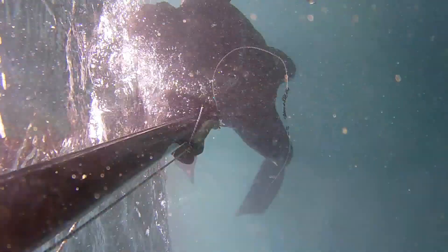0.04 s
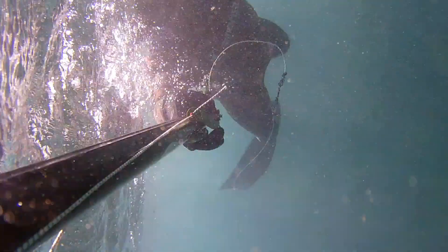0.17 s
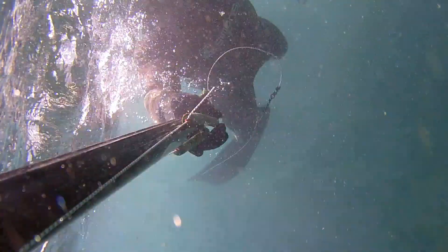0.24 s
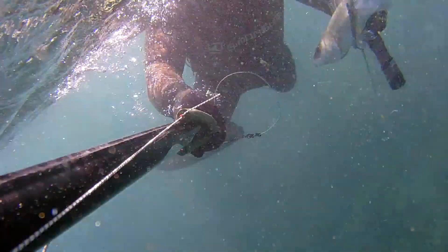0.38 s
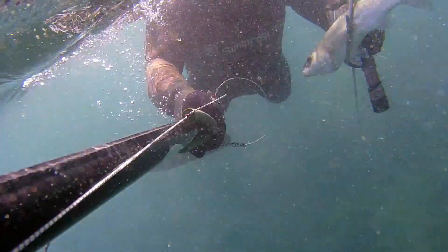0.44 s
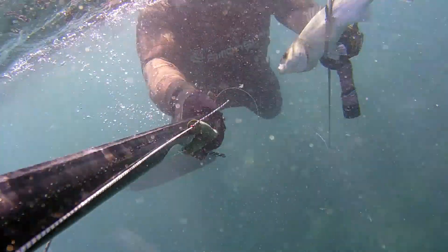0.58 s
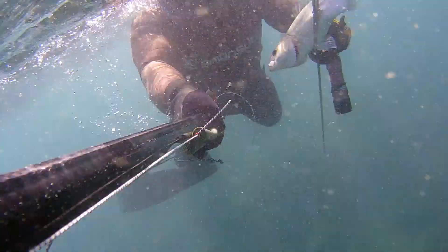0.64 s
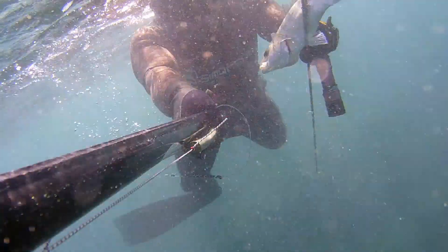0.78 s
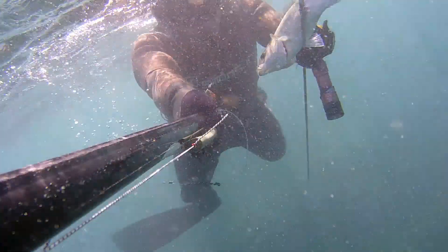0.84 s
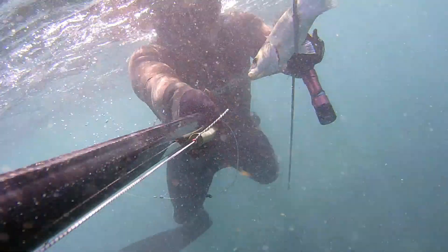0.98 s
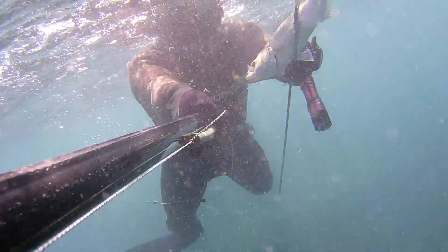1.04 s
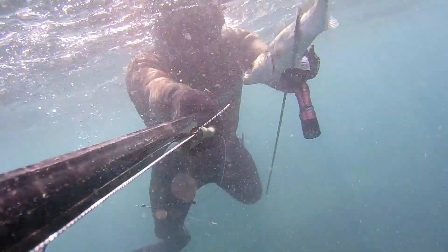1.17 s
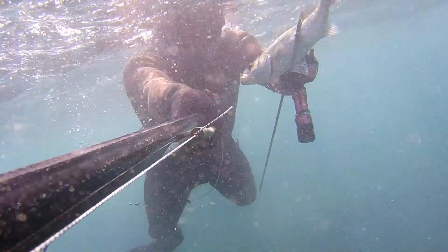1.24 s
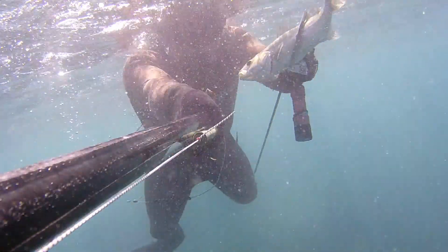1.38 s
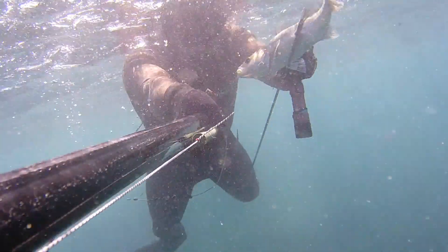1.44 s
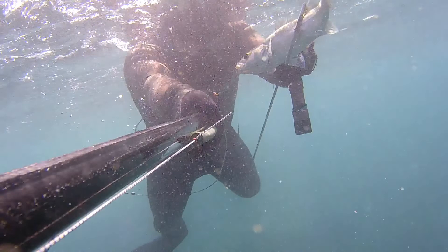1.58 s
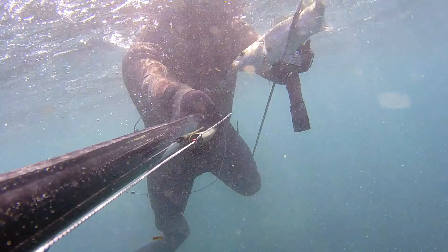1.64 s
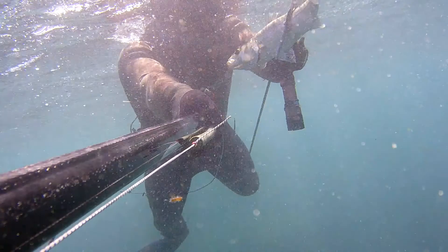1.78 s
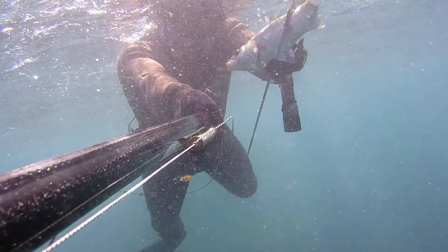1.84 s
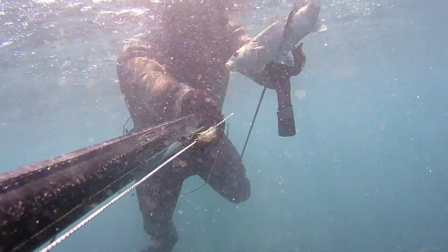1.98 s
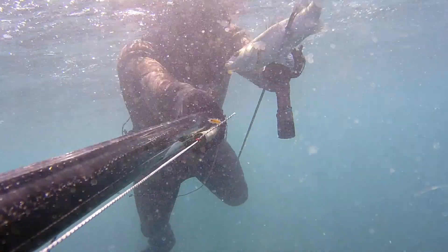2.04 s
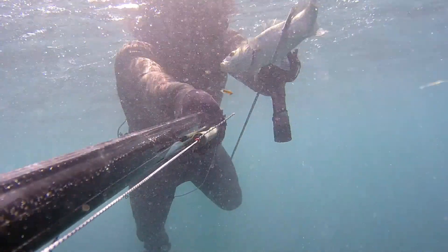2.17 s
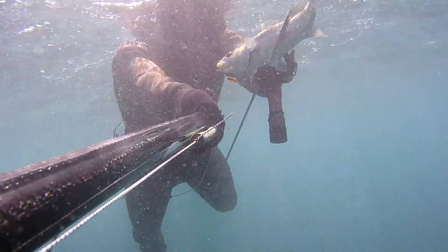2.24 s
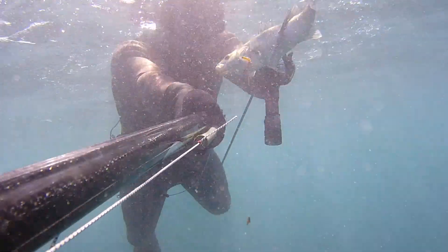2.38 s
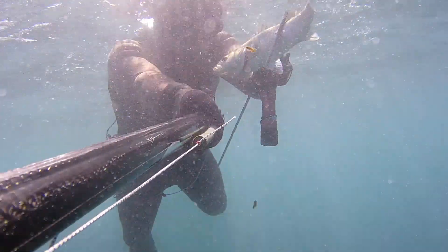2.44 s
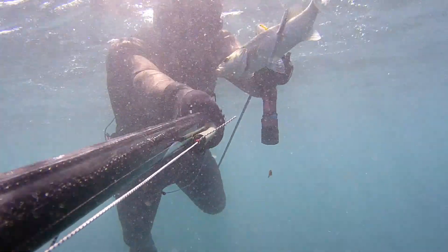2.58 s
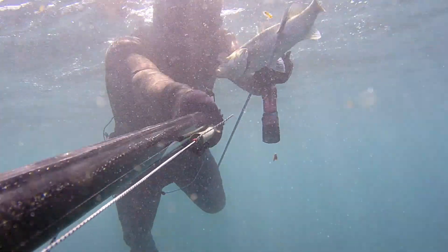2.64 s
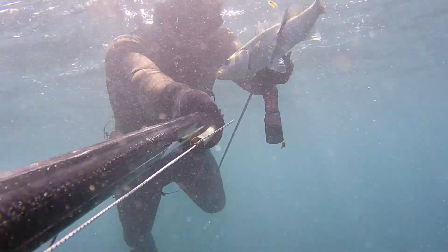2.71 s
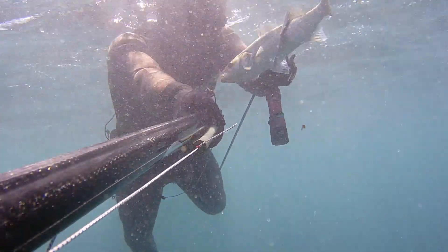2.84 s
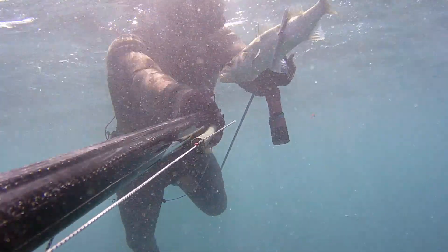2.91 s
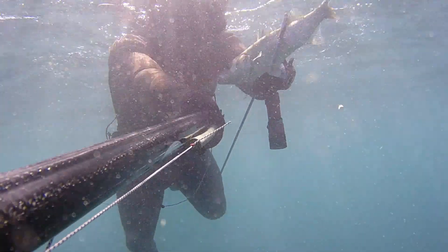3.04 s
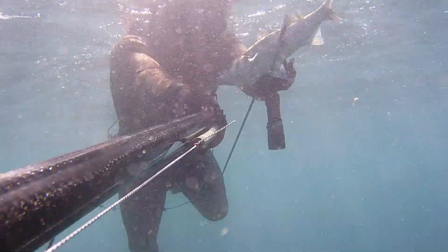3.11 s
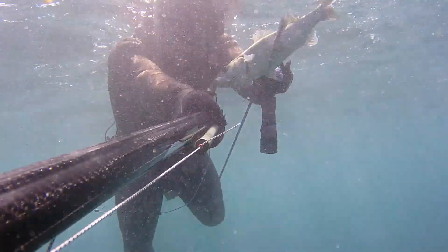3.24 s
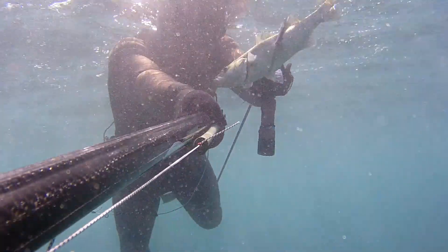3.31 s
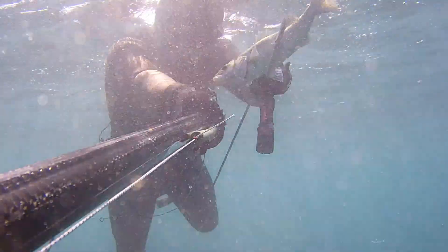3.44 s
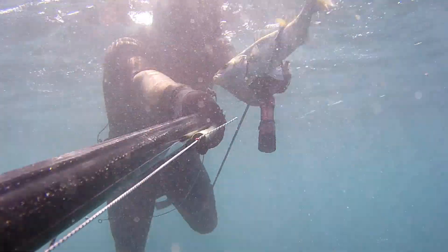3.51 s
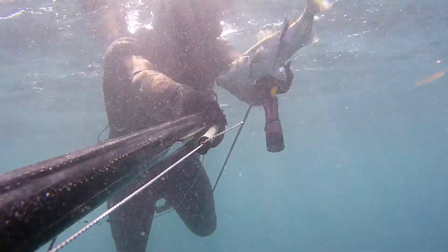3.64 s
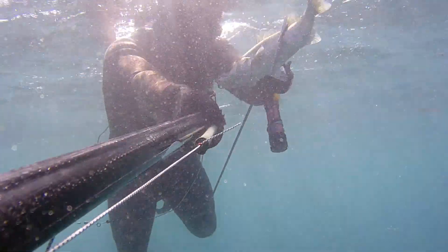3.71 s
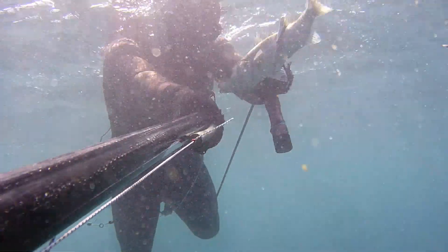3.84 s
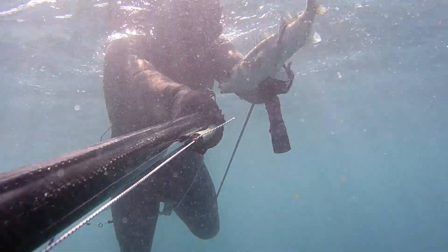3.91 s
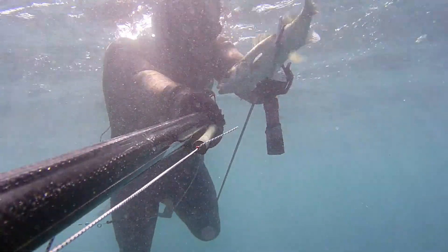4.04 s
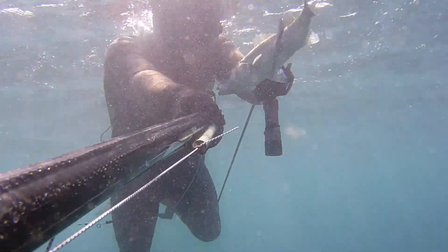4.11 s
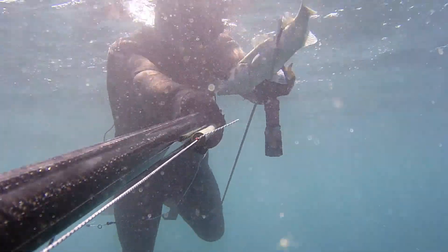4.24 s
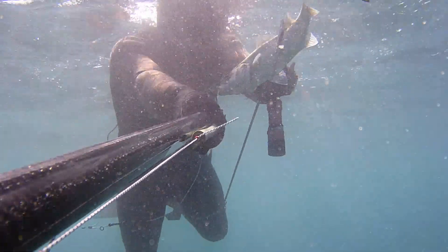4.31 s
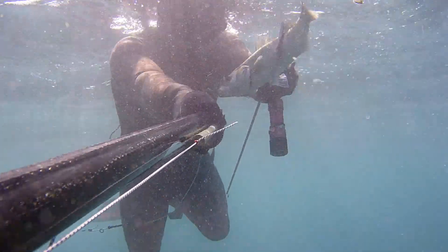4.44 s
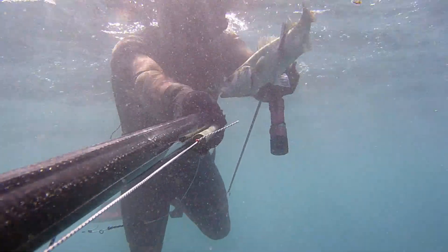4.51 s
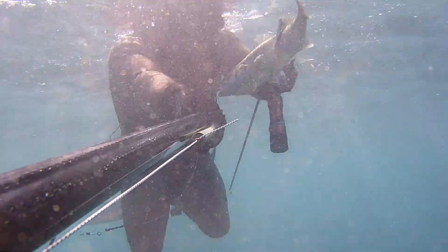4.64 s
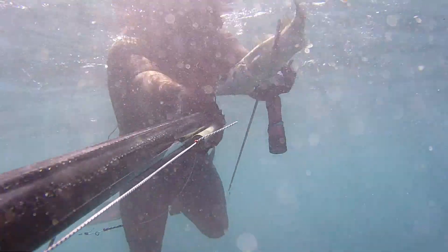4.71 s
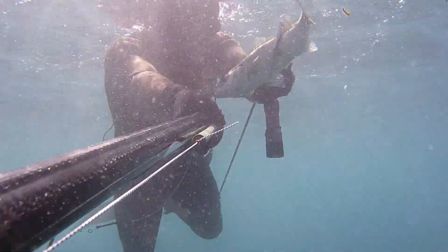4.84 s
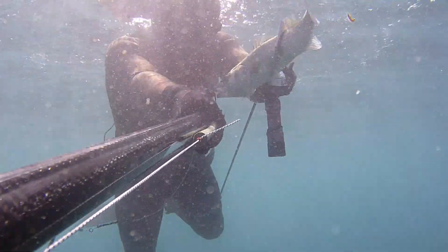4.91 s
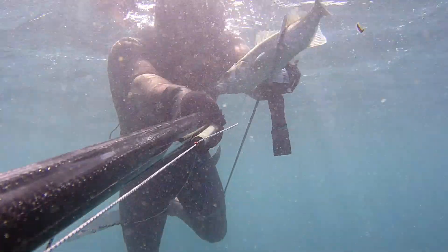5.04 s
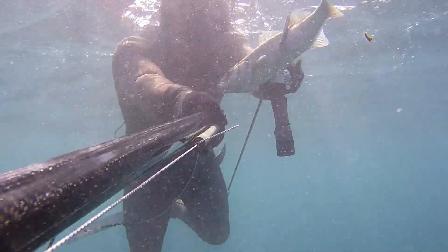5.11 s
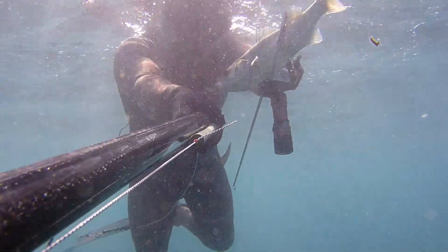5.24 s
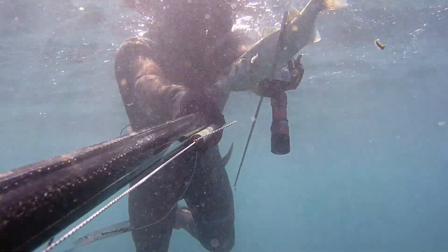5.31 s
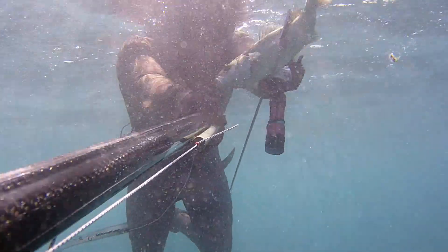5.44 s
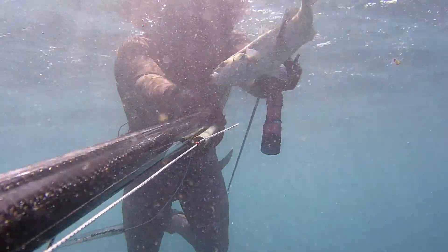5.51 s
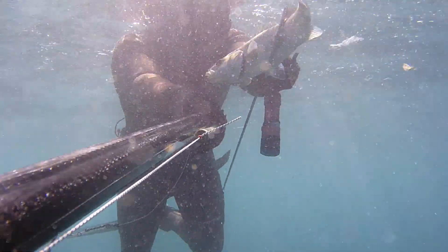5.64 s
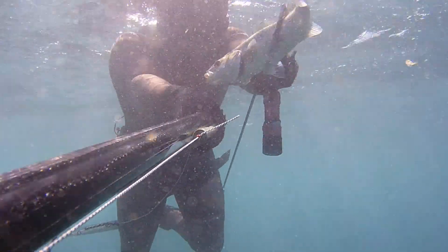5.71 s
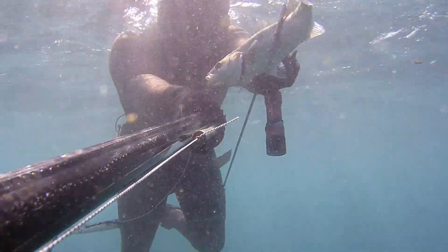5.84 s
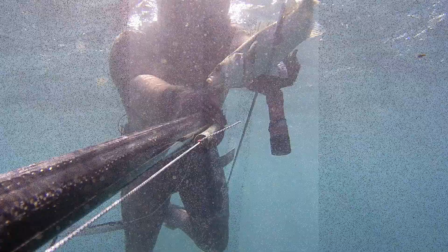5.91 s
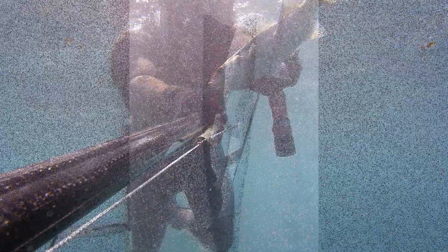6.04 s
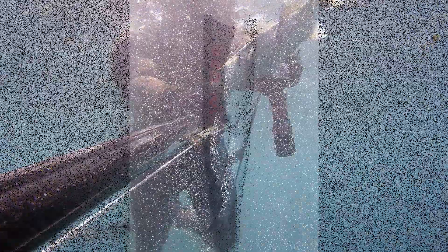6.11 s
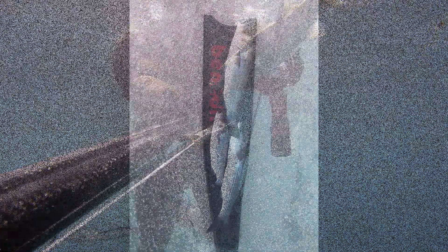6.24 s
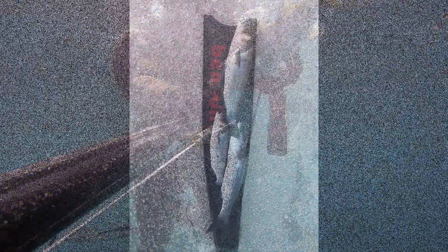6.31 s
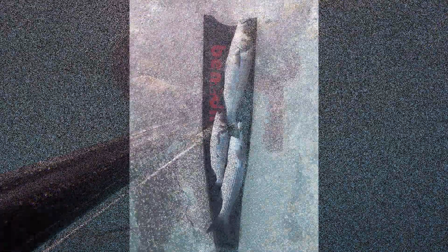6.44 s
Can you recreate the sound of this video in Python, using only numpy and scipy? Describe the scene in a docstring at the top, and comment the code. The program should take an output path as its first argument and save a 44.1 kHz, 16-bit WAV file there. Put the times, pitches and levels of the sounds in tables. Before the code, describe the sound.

Just beneath the surface, a microphone in a housing on a speargun catches hard knocks, rubbing line and sloshing bubbles. Within the first second the blows distort, peaking near half a second, followed by a loud ringing bubble. After that it turns much quieter: soft knocks, double clacks, tiny ticks and low grip rumble over the faint dull wash of open water, stopping abruptly.

```python
"""Just below the surface of open water, close up: a microphone in a housing rides on a diver's speargun.
The gun is swung round: hard knocks, sloshing and a loud ringing bubble overload the microphone.
Then gun and line knock softly on the housing, the gun clacks through its play, the grip rumbles and creaks.
Knocks ring decaying housing modes, shaft ticks are pings with noise bursts, and bubbles are gliding sines.
Shaped noise is the distant wash of the water; swarms of random bubbles make the sloshing."""
import sys
import numpy as np
from scipy import signal
from scipy.fft import rfft, irfft
from scipy.io import wavfile
from scipy.ndimage import uniform_filter1d

SR = 44100
rng = np.random.default_rng(int(sys.argv[2]) if len(sys.argv) > 2 else 0)


def master(y):
    """Save y as 16-bit WAV."""
    cut = np.clip(np.atleast_2d(y).T, -1, 1)
    pcm = np.round(cut * 32767)  # scale
    wavfile.write(sys.argv[1], SR, pcm.astype(np.int16))


N = 285765
TIME = np.arange(N) / SR
END_S = 6.335  # all is silent from here


def from_db(db):
    """Decibels to amplitude gain."""
    return 10 ** (np.asarray(db) / 20)


def rms_one(x):
    """Scale to unit rms."""
    return x / np.sqrt(np.mean(x ** 2) + 1e-20)


def in_time(rows):
    """Interpolate each column of a curve over its first column, time, at every sample."""
    s, *columns = np.transpose(rows)
    return [np.interp(TIME, s, column) for column in columns]


def cut(x, hz, kind, order=2):
    """Butterworth filter."""
    edges_hz = np.clip(hz, 10, SR * .45)
    sections = signal.butter(order, edges_hz, kind, fs=SR, output="sos")
    return signal.sosfilt(sections, x + 1e-18)


def add(out, start_s, sound):
    """Mix a sound in from its start time."""
    i = max(round(start_s * SR), 0)
    out[i:i + len(sound)] += sound[:N - i]


def dying(t, t60):
    """Exponential decay, down 60 dB after t60 seconds."""
    return from_db(-60 * t / t60)


def ring(clicks, hz, t60):
    """Two-pole resonator: a unit click sets a dying sine of initial height 1 ringing."""
    r = dying(1 / SR, t60)
    w = 2 * np.pi * hz / SR
    return signal.lfilter([0, np.sin(w)], [1, -2 * r * np.cos(w), r * r], clicks + 1e-18)


def grains(per_s, spread_db):
    """Random clicks of uneven size and sign."""
    sizes = from_db(spread_db * np.minimum(rng.exponential(1, N), 4))
    signs = rng.choice([-1, 1], N)
    return sizes * signs * (rng.random(N) < per_s / SR)


def bubble(t, hz, t60, rise, pinch_s=0.00045):
    """A bubble pinches off and rings as a dying sine whose pitch glides by rise octaves per s."""
    phase = 2 * np.pi * np.cumsum(hz * 2 ** (rise * t)) / SR
    onset = np.exp(-t / pinch_s) - 1
    return onset * dying(t, t60) * np.sin(phase)


def swarm(per_s, low_hz, high_hz, cycles, rise, span):
    """Bubbles at random times over span seconds, rising in pitch; the smaller, the weaker. Unit rms there."""
    out, t = np.zeros(N), TIME[:SR // 8]
    for when, size, strength in rng.random((round(per_s * span), 3)):
        hz = low_hz * (high_hz / low_hz) ** size
        t60 = cycles / hz
        add(out, when * span, (strength + .5) / hz ** 2 * bubble(t, hz, t60, rise))
    return out / np.std(out[TIME < span])


# spectrum of the open water all round: pitch_hz [Hz], level_db [dB, relative]
SEA_SPECTRUM = [(25, -20.5), (66, -6), (148, -5), (260, -9), (550, -7.5), (1150, -17.5), (2060, -22),
                (5140, -33), (15500, -41.5)]
SEA_DB = -52  # rms of the whole wash


def sea():
    """Noise shaped in frequency: the steady dull wash of the open water with a faint hiss on top."""
    hz, level_db = np.transpose(SEA_SPECTRUM)
    bins_hz = np.maximum(np.fft.rfftfreq(N, 1 / SR), 1)
    shape = from_db(np.interp(np.log(bins_hz), np.log(hz), level_db))
    wash = irfft(rfft(rng.standard_normal(N)) * shape, N)
    return from_db(SEA_DB) * rms_one(wash)


# swell of the sloshing at the surface just above: start_s [s], level_db [dB, of the gurgle]
SLOSH_SWELL = [(0, -21.5), (.04, -36), (.14, -58), (0.181, -29.5), (.38, -50), (0.601, -28), (.7, -30.5),
               (0.759, -43), (.9, -36.5), (1.02, -54), (1.5, -49)]


def slosh(fizz_db=-24):
    """Trapped air rings in swarms: a gurgle of mid-sized bubbles under a fizz of tiny ones."""
    span = SLOSH_SWELL[-1][0]
    gurgle = swarm(per_s=480, low_hz=475.5, high_hz=1257, cycles=39, rise=2.7, span=span)
    fizz = swarm(per_s=270, low_hz=2600, high_hz=4940, cycles=13, rise=3, span=span)
    level_db, = in_time(SLOSH_SWELL)
    return from_db(level_db) * (gurgle + from_db(fizz_db) * fizz)


# path of a large air pocket climbing to the surface: start_s [s], pitch_hz [Hz], level_db [dB, peak]
AIR_POCKET_PATH = [(.785, 250, -48), (.805, 247.3, -12), (.86, 271, -26), (.92, 279, -30),
                   (.95, 305, -38.5), (.98, 342, -44.5), (1.005, 435, -37.5), (1.04, 473, -39)]


def air_pocket():
    """One long sine, swooping up as the water above the pocket thins."""
    hz, level_db = in_time(AIR_POCKET_PATH)
    alive = (TIME > AIR_POCKET_PATH[0][0]) & (TIME < AIR_POCKET_PATH[-1][0])
    return alive * from_db(level_db) * np.sin(2 * np.pi * np.cumsum(hz) / SR)


# single bubbles near the housing, and the short low thumps of the loudest knocks:
# start_s [s], pitch_hz [Hz, at the start], level_db [dB, about peak], t60_s [s]
BUBBLES_AND_THUMPS = [(.232, 650, -19.5, 0.056), (0.352, 194, -7.5, 0.023), (.354, 314, -2, 0.036),
                      (0.452, 345, -1.5, 0.024), (.462, 241, -5.5, 0.13), (0.481, 186, -9.5, 0.11),
                      (0.497, 532.4, -4.5, 0.084), (.511, 3530, -34, 0.025), (.561, 3030, -15.5, 0.023),
                      (.568, 793, -12.5, 0.049), (.571, 644, -14, .06), (.575, 274, -30.5, 0.97),
                      (.619, 652, -16, .14), (.62, 2800, -27.5, .03), (0.665, 382, -13, 0.036),
                      (.674, 700, -18.5, 0.18), (.677, 894, -14, 0.091), (0.685, 2870, -36.5, 0.064),
                      (.784, 459.4, 4.5, 0.17), (.784, 533, -7, 0.13), (.8, 671, -4.5, 0.12),
                      (.876, 619, -18, 0.19), (0.981, 1034, -34, 0.053), (1.076, 2830, -39.5, 0.019),
                      (1.079, 653, -30, 0.17), (3.824, 579, -26, 0.081)]
# pitches above the steady one glide up, lower ones sag: octaves per s for each octave of pitch
STEADY_HZ, GLIDE_PER_OCTAVE, MAX_GLIDE_OCTAVES_PER_S = 459.5, 2.9, 2.1


def bubbles_and_thumps():
    """Dying sines: single bubbles down to tiny pings, and low thumps under the loudest knocks."""
    out = np.zeros(N)
    for start_s, hz, level_db, t60 in BUBBLES_AND_THUMPS:
        rise = min(GLIDE_PER_OCTAVE * np.log2(hz / STEADY_HZ), MAX_GLIDE_OCTAVES_PER_S)
        add(out, start_s, from_db(level_db) * bubble(TIME[:SR // 3], hz, t60, rise))
    return out


def ringing_grains(level_db=-11):
    """Small ringing grains gliding upward, scattered at random about eleven a second, louder around blows."""
    scattered = swarm(per_s=11, low_hz=498, high_hz=1050, cycles=30, rise=4, span=END_S)
    return from_db(grip_db() + level_db) * scattered


# drag of the line along the barrel: start_s [s], level_db [dB]
LINE_DRAG = [(0, -61), (.11, -36), (.14, -50.5), (.3, -38.5), (.41, -61.5), (.62, -41), (.74, -51),
             (1.0, -93)]


def line_rub(slips_per_s=900):
    """Quick slips of the line excite the upper housing modes."""
    rings = np.zeros(N)
    for hz, mode_db, t60 in HOUSING_MODES:
        if hz > REGISTER_EDGES[1]:
            rings += from_db(mode_db) * ring(grains(slips_per_s, 6.7), hz, t60)
    level_db, = in_time(LINE_DRAG)
    return from_db(level_db) * rms_one(cut(rings, [1250, 1800], "band"))


# the grip tightens before each blow and relaxes after it, more so for a strong one
GRIP_REST_DB, GRIP_PEAK_DB, GRIP_FOLLOWS = -49, -28.5, 0.38  # peak for a blow of 0 dB; dB per dB of blow
GRIP_TIGHTEN_DB_PER_S, GRIP_RELAX_DB_PER_S = 174.5, 73


def grip_db():
    """How hard the grip works the gun: it swells round every blow and sinks back to rest."""
    s, db, *_ = np.transpose(contacts())
    coarse = TIME[::200]
    since = coarse[:, None] - s
    fall_db = np.maximum(GRIP_RELAX_DB_PER_S * since, -GRIP_TIGHTEN_DB_PER_S * since)
    swells = GRIP_PEAK_DB + GRIP_FOLLOWS * db - fall_db
    return np.interp(TIME, coarse, np.maximum(swells.max(axis=1), GRIP_REST_DB))


def handling(rumble_db=-3, creak_db=-9.5, creaks_per_s=70, dull_hz=1100):
    """The shifting grip excites the housing: a rumble in the low modes, tiny creaks in the others."""
    effort = from_db(grip_db())
    push = effort * grains(500, 3.3)
    slips = effort * grains(creaks_per_s, 2.3)
    rumble, creaks = np.zeros((2, N))
    for hz, mode_db, t60 in HOUSING_MODES:
        if hz < REGISTER_EDGES[0]:
            rumble += from_db(mode_db) * ring(push, hz, t60)
        if hz > REGISTER_EDGES[0]:
            # each slip meets every mode with a strength of its own
            creaks += from_db(mode_db) * ring(slips * rng.standard_normal(N), hz, t60)
    creaks = cut(cut(creaks, dull_hz, "low", order=1), [330, 2200], "band")
    mix = from_db(rumble_db) * rms_one(rumble) + from_db(creak_db) * rms_one(creaks)
    return np.sqrt(np.mean(effort ** 2)) * mix


# lone sharp ticks of shaft and line: start_s [s], level_db [dB], pitch_hz [Hz]
LONE_TICKS = [(.187, -29, 3296), (.21, -29, 3070), (.479, -24, 3930), (.493, -22.5, 3220),
              (.527, -36, 2850), (.664, -29, 3450), (.718, -33, 3130), (.878, -38.5, 4030),
              (.927, -36, 3240), (1.204, -36, 3470), (1.441, -38.5, 3850), (1.547, -39, 3560),
              (1.83, -35.5, 3640), (2.008, -46.5, 4330), (2.552, -41, 5100), (3.289, -38.5, 2780),
              (3.388, -24.5, 2780), (3.634, -44.5, 3340), (3.745, -30, 2830), (4.385, -44, 3500),
              (4.427, -36.5, 3640), (4.66, -47, 3600), (4.95, -27.5, 3200), (5.003, -37, 3620),
              (5.062, -37.5, 3150), (5.192, -33.5, 3470), (5.557, -46, 3480), (5.708, -44, 3600)]
SEAT_TICK_DB, SEAT_TICK_HZ = -15.5, 2860  # level against the seat of a clack


def all_ticks():
    """The lone ticks and the one at the seat of each clack: (start_s, level_db, pitch_hz)."""
    seat_ticks = [(s + SEAT_AFTER_S, seat_db + SEAT_TICK_DB, SEAT_TICK_HZ) for s, _, seat_db, _ in GUN_CLACKS]
    return list(LONE_TICKS) + seat_ticks


def ticks(t60=0.0064, tone_db=0, spray_db=-2, spray_t60=0.028, below=4.05, above=1.186):
    """A tick is a brief ping with a burst of fine contacts, noise filtered round its pitch."""
    out, t = np.zeros(N), TIME[:SR // 16]
    for start_s, level_db, hz in all_ticks():
        ping = from_db(tone_db) * dying(t, t60) * np.sin(2 * np.pi * hz * t)
        spray = 2 * from_db(spray_db) * dying(t, spray_t60) * rng.standard_normal(len(t))
        tick = cut(cut(ping + spray, hz / below, "high"), hz * above, "low", order=6)
        add(out, start_s, from_db(level_db) * tick)
    return out


# modes of the steel shaft: pitch_hz [Hz], level_db [dB], t60_s [s]
SHAFT_MODES = [(3383, -2.5, 0.04), (4720, -6, 0.018), (6000, -26, .025), (8880, -22, 0.064)]
# a blow's crack grows faster than its ring: level at a ring of 0 dB, and dB per dB of ring
KNOCK_CRACK_DB, KNOCK_CRACK_GROWTH = -23, 1.8
# a higher tick cracks more: level against the tick at the given pitch, and its growth
TICK_CRACK_DB, TICK_CRACK_HZ, TICK_CRACK_DB_PER_OCTAVE = -31, 3240, 24.5


def cracks(crack_t60=0.033, crack_top_hz=10500, shaft_db=8):
    """Ticks and blows give a noise crack and ring the shaft, high ticks and hard blows the most."""
    sharp = []
    for s, db, hz in all_ticks():
        octaves = np.log2(hz / TICK_CRACK_HZ)
        sharp.append((s, db + TICK_CRACK_DB + TICK_CRACK_DB_PER_OCTAVE * octaves))
    for s, *contact in contacts():
        ring_db = register_levels(*contact)[-1]
        sharp.append((s, KNOCK_CRACK_DB + KNOCK_CRACK_GROWTH * ring_db))
    crack, blows = np.zeros((2, N))
    t = TIME[:SR // 16]
    for s, db in sharp:
        add(crack, s, 2 * from_db(db) * dying(t, crack_t60) * rng.standard_normal(len(t)))
        add(blows, s, from_db([db + shaft_db]))
    shaft = sum(from_db(db) * ring(blows, hz, t60) for hz, db, t60 in SHAFT_MODES)
    return shaft + cut(cut(crack, 2100, "high"), crack_top_hz, "low")


# single knocks of gun and line on the housing: start_s [s], level_db [dB], hardness_db [dB]
SINGLE_KNOCKS = [(.001, -16, -0.5), (.021, -20.5, -9), (.031, -22, -11), (0.103, -35.5, -6),
                 (0.175, -25.5, -6), (.188, -15.5, 24.5), (.208, -14.5, 7.5), (.216, -15.5, 11),
                 (0.266, -21, 17), (.294, -25.5, -5), (.317, -17, 3.5), (.361, -8, 8), (0.414, -25.5, 25),
                 (0.459, 0, 3), (.477, -6.5, 2), (.489, -7, 10), (.538, -20.5, 11), (.611, -24, 14),
                 (.664, -12, 12), (.702, -20.5, 16.5), (.915, -26.5, 0), (1.176, -22.5, 3),
                 (1.235, -24.5, 21.5), (1.327, -34.5, 2), (1.374, -19.5, 13), (1.4, -22, 5),
                 (1.44, -26.5, -2), (1.477, -29, 1), (1.53, -33, -3.5), (1.609, -38.5, 16),
                 (1.756, -29, -0.5), (1.792, -24.5, 0.5), (1.871, -35.5, -3), (1.985, -26.5, -1),
                 (2.008, -30.5, -2), (2.067, -32, -0.5), (2.108, -31, 0), (2.161, -35.5, 2),
                 (2.357, -34.5, 22), (2.373, -30.5, 2), (2.637, -37, -4), (2.664, -44, 33),
                 (2.852, -40.5, 19), (2.986, -36, 1), (3.083, -37.5, -2), (3.137, -34, -1.5),
                 (3.18, -41, 43), (3.258, -35.5, -3), (3.306, -37.5, 1), (3.356, -33.5, 26),
                 (3.408, -34.5, 2), (3.424, -30.5, 27), (3.602, -37, -5), (3.668, -38.5, 17),
                 (3.761, -41, -5), (3.923, -36, 16), (4.006, -34.5, 19), (4.183, -36, -2),
                 (4.287, -40.5, -7), (4.364, -38.5, 2), (4.56, -43, -4), (4.642, -35.5, -5.5),
                 (4.694, -36.5, -2), (4.836, -37, 1), (4.932, -29.5, 8), (4.975, -41, 9), (5.004, -33, -3),
                 (5.051, -30.5, 3), (5.155, -37.5, -7.5), (5.402, -41.5, -7), (5.489, -31, -2),
                 (5.535, -32.5, 13), (5.705, -34.5, 1), (5.88, -28, -1), (5.959, -34.5, -2),
                 (6.055, -34, -2), (6.18, -32, -3), (6.234, -29.5, 2)]
# the gun shifts through its play, touching, seating and rebounding:
# start_s [s], touch_db [dB], seat_db [dB], hardness_db [dB, of the seat]
GUN_CLACKS = [(.346, -6.5, -6.5, -15), (.448, -6.5, -3, -4), (1.153, -26.5, -21.5, 3),
              (1.202, -20.5, -24, 10), (1.905, -25, -17.5, 3.5), (2.023, -29.5, -28.5, -3),
              (2.203, -35, -28, -13), (2.311, -30.5, -26, -9), (2.523, -24, -24, 24),
              (2.583, -33, -24.5, -13.5), (3.024, -29, -24, -11), (3.705, -26.5, -24, -7),
              (4.227, -30.5, -25.5, -7), (5.093, -34, -28, -12), (5.581, -30, -20.5, 17),
              (5.835, -28.5, -24.5, 0), (6.002, -32, -25, -11.5)]
SEAT_AFTER_S, TOUCH_HARDNESS_DB = .006, -1.3
REBOUND_AFTER_S, REBOUND_DB, REBOUND_HARDNESS_DB = 0.019, -10, -11.5  # after the seat, against its level
# seat and rebound happen within the gun and shake the housing less
SEAT_THUMP_DB, REBOUND_THUMP_DB = -13, -10.5


def contacts():
    """Every blow on the housing, a clack giving three: (start_s, level_db, hardness_db, thump_offset_db)."""
    rows = [(s, db, hardness, 0) for s, db, hardness in SINGLE_KNOCKS]
    for s, touch_db, seat_db, hardness in GUN_CLACKS:
        seat_s = s + SEAT_AFTER_S
        rebound_s = seat_s + REBOUND_AFTER_S
        rows.append((s, touch_db, TOUCH_HARDNESS_DB, 0))
        rows.append((seat_s, seat_db, hardness, SEAT_THUMP_DB))
        rows.append((rebound_s, seat_db + REBOUND_DB, REBOUND_HARDNESS_DB, REBOUND_THUMP_DB))
    return rows


# a hard contact trades thump for ring: levels against the body for a soft knock of hardness 0,
# and dB of ring per dB of hardness
THUMP_DB, RING_DB, RING_PER_HARDNESS = 0.5, -4.5, 0.32
# the thump grows more slowly than the blow: dB per dB, counted from a typical soft knock
THUMP_GROWTH, SOFT_KNOCK_DB = 0.79, -30


def register_levels(db, hardness, thump_offset_db):
    """Thump, body and ring of a blow, in dB."""
    grown_db = SOFT_KNOCK_DB + THUMP_GROWTH * (db - SOFT_KNOCK_DB)
    thump_db = grown_db + THUMP_DB + thump_offset_db - hardness
    ring_db = db + RING_DB + RING_PER_HARDNESS * hardness
    return np.array([thump_db, db, ring_db])


# modes of gun and housing: pitch_hz [Hz], level_db [dB], t60_s [s]
HOUSING_MODES = [(30.9, -2.5, 0.14), (91, -8, 0.14), (119, -7.5, 0.077), (149, 0, 0.11), (190, -9.5, 0.057),
                 (216.3, -8, 0.033), (519, 5.5, 0.02), (556, 5, 0.03), (693.5, 0.5, 0.031),
                 (949, -6.5, 0.023), (1417, 2.5, 0.024), (1456, 3.5, 0.013), (1785, -8.5, 0.015)]
# borders between thump, body and ring: pitch_hz [Hz]
REGISTER_EDGES = [300, 1200]


def knocks(soft_hz=2200, rattle_t60=0.067, detune=.014, vary_db=1.2, rattle=.012):
    """Each blow rings all housing modes, a little differently each time, and leaves a faint rattle."""
    out, t = np.zeros(N), TIME[:SR // 6]
    hz, mode_db, t60 = np.transpose(HOUSING_MODES)
    register = np.searchsorted(REGISTER_EDGES, hz)
    signs = (-1) ** np.arange(len(hz))
    rattling = dying(t, rattle_t60) - dying(t, rattle_t60 / 2)
    for start_s, *contact in contacts():
        pitch, strength = rng.standard_normal((2, len(hz)))
        gains = signs * from_db(register_levels(*contact)[register] + mode_db + vary_db * strength)
        struck_hz = hz * (1 + detune * pitch)
        modes = dying(t, t60[:, None]) * np.sin(2 * np.pi * struck_hz[:, None] * t)
        blow = gains @ modes
        # the rattle is the blow smeared by swelling and dying noise
        smear = 2 * rattle * rattling * rng.standard_normal(len(t))
        add(out, start_s, blow + signal.fftconvolve(blow, smear)[:len(t)])
    return cut(cut(out, soft_hz, "low", order=6), 39, "high", order=1)


def scene():
    """Everything reaches the one microphone through water and housing."""
    gun = knocks() + ticks() + cracks() + line_rub() + handling()
    water = bubbles_and_thumps() + air_pocket() + slosh() + ringing_grains() + sea()
    return (gun + water)[None]


def record(dry, grit_db=-34, grit_top_hz=4000, ceiling=.47, top_hz=15600):
    """The microphone clips flat and grittily when overloaded; at END_S all falls silent."""
    overloaded = uniform_filter1d((np.abs(dry) > ceiling) * 1., size=60)
    noise = cut(rng.standard_normal(N), grit_top_hz, "low", order=1)
    grit = from_db(grit_db) * overloaded * noise
    clipped = dry / (1 + (dry / ceiling) ** 12) ** (1 / 12) + grit
    # the microphone passes no steady pressure
    clipped = cut(clipped, 10, "high", order=1)
    fade = np.clip((END_S - TIME) / .005, 0, 1)
    treble_limit = signal.ellip(10, .1, 90, top_hz, fs=SR, output="sos")
    return signal.sosfilt(treble_limit, clipped * fade)


dry = scene()
out = record(dry)
master(out)
```